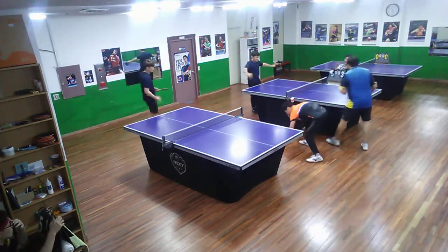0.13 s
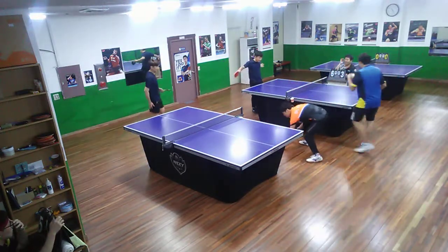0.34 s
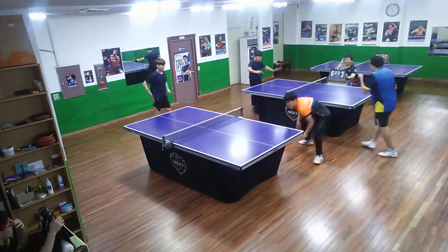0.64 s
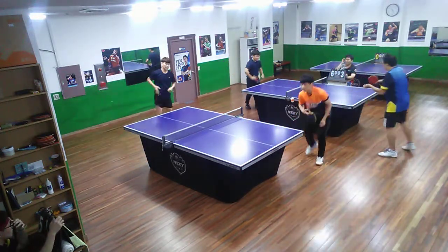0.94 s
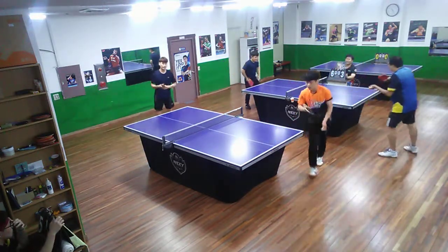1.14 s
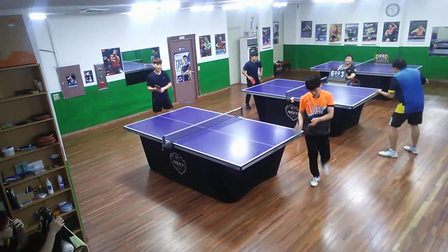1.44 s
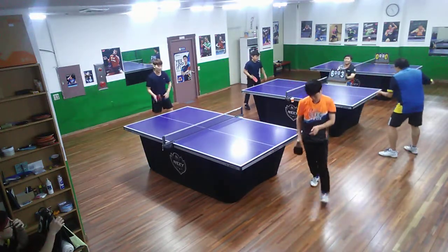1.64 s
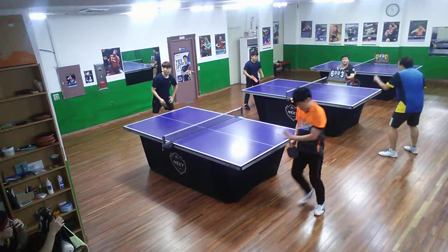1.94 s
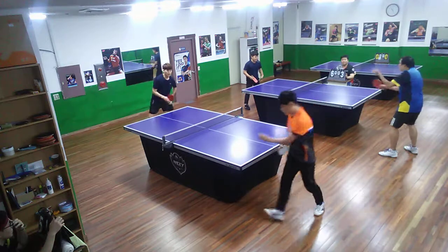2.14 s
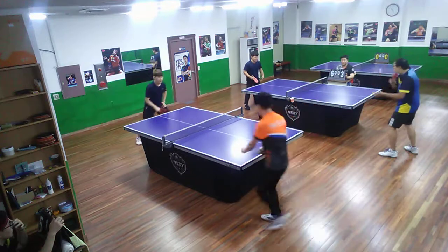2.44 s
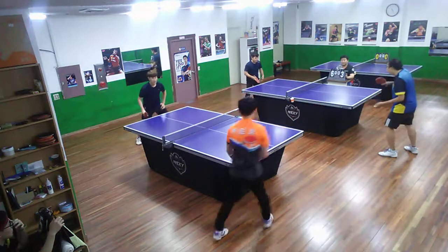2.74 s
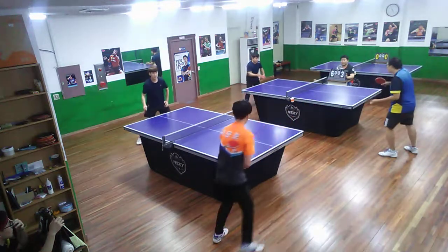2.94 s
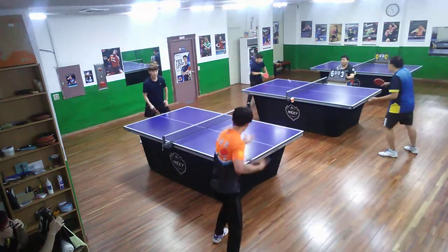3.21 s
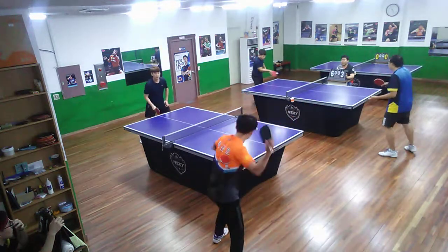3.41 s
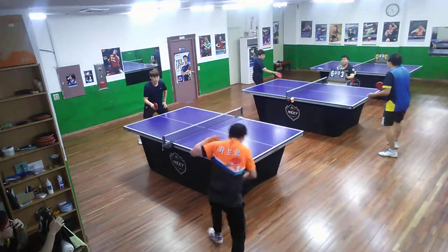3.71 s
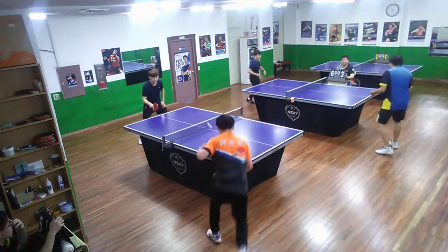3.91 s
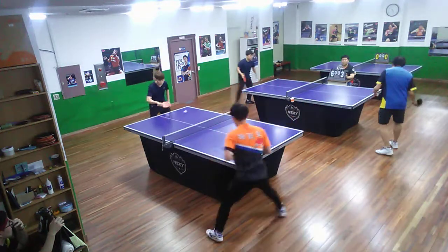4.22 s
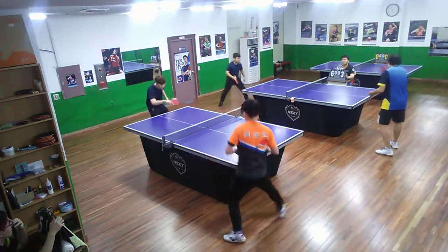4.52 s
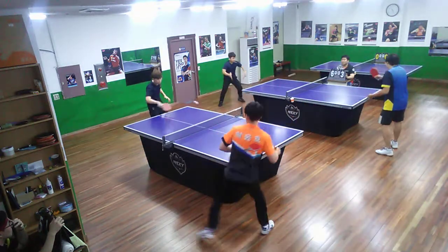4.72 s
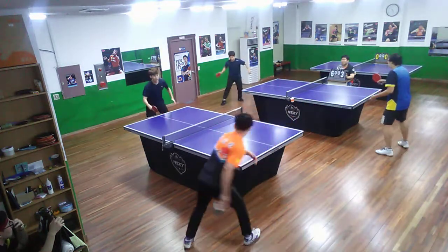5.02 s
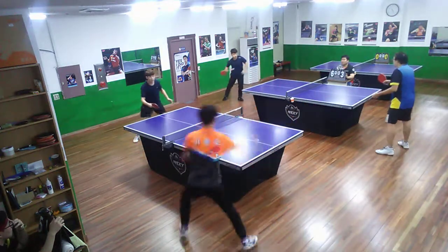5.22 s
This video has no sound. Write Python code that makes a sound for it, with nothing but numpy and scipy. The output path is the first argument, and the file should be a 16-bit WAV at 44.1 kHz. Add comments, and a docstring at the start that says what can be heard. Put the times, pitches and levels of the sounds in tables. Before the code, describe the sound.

Table tennis is heard in a bare, echoing club room through a fixed microphone, over a soft, suppressed ventilation hush. A shoe slaps and thuds on the wooden floor at the very start, and two hollow ball bounces follow around 0.3 seconds. Faint shoe squeaks come between 1 and 1.3 seconds. A table bounce at 1.4 leads to a sharp bat crack and a light step at 1.7. After a short lull and another step, four quick pocks cluster between 2.6 and 2.9. A bounce at 3.3 and faint squeaks precede bat hits at 3.5 and 3.7. At 3.8 a sharp heel clack and a heavy, booming stamp land, followed at once by a hard bat crack. Bounces ring at 4.1 and 4.4, with another bat hit and a footfall by 4.6. Two more bounces at 4.9 and 5.1 lead to a firm stroke at 5.3.

```python
"""Hollow pocks of table tennis echo from several tables around a bare club room.
Plastic balls knock on bats and table tops: the wood sounds and the thin shells ring.
Shoes slap, stamp and faintly squeak on the sprung wooden floor. It is all heard through a fixed camera,
whose noise suppressor holds down the ventilation and shortens the faint ends of the echoes."""
import sys
import numpy as np
from scipy import signal
from scipy.fft import rfft, irfft, next_fast_len
from scipy.io import wavfile
from scipy.ndimage import uniform_filter1d, map_coordinates

SR = 44100
rng = np.random.default_rng(int(sys.argv[2]) if len(sys.argv) > 2 else 0)


def generate_wav(sig):
    """Save sig (samples, or channels by samples) to the path in sys.argv[1] as 16-bit PCM at SR."""
    pcm = np.round(np.clip(np.atleast_2d(sig).T, -1, 1) * 32767).astype(np.int16)
    wavfile.write(sys.argv[1], SR, pcm)


N = 236420
SIZE = 4096  # samples in one dry contact
TIME = np.arange(SR) / SR
FREQS = np.fft.rfftfreq(SIZE, 1 / SR)

# Tone colour of a sole slapping the floor. Each row: frequency in Hz, level in dB.
SOLE_SLAP = [(60, -50.5), (200, -18), (600, 2.5), (1400, 2.5), (2300, -2), (3600, -0.5), (4300, 1),
             (5300, 1), (6600, -10.5), (9000, -19.5), (15000, -32)]


def amp(db):
    """Decibels to gain."""
    return 10 ** (np.asarray(db) / 20)


def along(points, hz):
    """Read a curve of (Hz, value) points on a log frequency axis."""
    f, v = np.transpose(points)
    return np.interp(np.log(hz + 1), np.log(f + 1), v)


def resonances(modes):
    """Gain over FREQS of modes, each given as centre in Hz, width in Hz, level in dB."""
    return sum(amp(db) / (1 + (2 * (FREQS - hz) / width) ** 2) for hz, width, db in modes)


def causal(gain):
    """The shortest pulse that has this gain over FREQS."""
    cepstrum = irfft(np.log(np.maximum(gain, 1e-6)))
    cepstrum[1:SIZE // 2] *= 2
    cepstrum[SIZE // 2 + 1:] = 0
    return irfft(np.exp(rfft(cepstrum)))


def burst(t60):
    """A dying puff of noise with energy 1."""
    puff = rng.standard_normal(SIZE) * np.exp(-np.log(1000) * TIME[:SIZE] / t60)
    return puff / np.linalg.norm(puff)


def add(track, s, sound):
    """Mix a sound in at s seconds."""
    start = max(round(s * SR), 0)
    part = sound[:max(len(track) - start, 0)]
    track[start:start + len(part)] += part


def hall(direct_db, build_s=0.011, wall_hz=12000):
    """The path from one spot in the room: direct sound, then a duller tail that swells and dies by band."""
    # Reverb time. Each row: frequency in Hz, seconds to fall 60 dB.
    reverb_times = [(100, 1.49), (300, 1.11), (700, 1.39), (1400, 1.15), (3000, 0.96), (5000, 0.9),
                    (8000, 0.72), (13000, 0.43)]
    hz, t, noise = signal.stft(rng.standard_normal(SR), SR, nperseg=256)
    fade = np.exp(-np.log(1000) * t / along(reverb_times, hz)[:, None])
    walls = 1 / np.sqrt(1 + (hz[:, None] / wall_hz) ** 16)  # the highest treble is soaked up
    tail = signal.istft(noise * fade * walls, SR, nperseg=256)[1][:SR]
    path = tail * (1 - np.exp(-TIME / build_s)) / np.sqrt(SR * .06)
    path[0] += amp(direct_db)
    return path


def ventilation(db=-54):
    """Moving air lays a soft, steady bed of noise."""
    # Colour of the air. Each row: frequency in Hz, relative level in dB.
    colour = [(18, -83), (30, -54.5), (328, -5), (355, -8.5), (460, -9.5), (567, -9.5), (774, -12),
              (1500, -16), (6200, -26), (7240, -27.5), (15000, -49)]
    gain = amp(along(colour, np.fft.rfftfreq(N, 1 / SR)))
    air = irfft(rfft(rng.standard_normal(N)) * gain, N)
    return amp(db) * air / air.std()


def squeaks(waver=0.086, drift_hz=1300):
    """Rubber sticks and slips on the varnish: a faint, unsteady, gliding whistle."""
    # Each row: start in seconds, relative level in dB, first and last pitch in Hz, length in seconds.
    slips = [(0.974, -61, 5050, 5026, 0.075), (1.075, -55, 5480, 5705, 0.06),
             (1.086, -58.5, 2300, 2270, 0.031), (1.138, -53, 1005, 577, 0.069),
             (1.311, -56.5, 2320, 2266, 0.015), (3.185, -60, 5225, 5480, .03),
             (3.444, -54.5, 2655, 2774, 0.072)]
    track = np.zeros(N)
    for s, db, start_hz, end_hz, length_s in slips:
        progress = np.minimum(TIME[:SIZE] / length_s, 1)
        drift = map_coordinates(rng.standard_normal(SIZE), [TIME[:SIZE] * drift_hz])
        hz = start_hz * (end_hz / start_hz) ** progress * (1 + waver * drift)
        whistle = amp(db) * np.sin(np.pi * progress) * np.sin(2 * np.pi * np.cumsum(hz) / SR)
        add(track, s, 2 * signal.fftconvolve(whistle, hall(direct_db=-1.3)))
    return track


def tread(gain, direct_db, decay_s):
    """A shoe's contact with this spectrum, heard through the room."""
    path = hall(direct_db - 18)
    add(path, 0, amp(direct_db) * burst(decay_s))  # the tread lands piece by piece
    return signal.fftconvolve(causal(gain), path)


def shoes(ring_width_hz=130):
    """The sole slaps, the boards thud, sole or board rings briefly, and the sprung floor booms."""
    # Each row: start in seconds, slap and thud in dB, ring pitch in Hz, ring and direct sound in dB,
    # contact decay in seconds.
    footfalls = [(0, 8, 10.5, 697, 26, -17, 0.011), (0.004, 6.5, -7.5, 421, 22, -6, 0.03),
                 (0.008, 2, -9, 1260, 23, -17, 0.024), (0.58, -10, -16, 774, -1, -6.5, 0.0087),
                 (1.657, -12, -12.5, 359, 13, -6, 0.046), (2.378, -5.5, -19, 1490, 2.5, -8.5, 0.006),
                 (3.8343, 9.5, 29, 350, 26, -3, 0.041), (4.549, 12, 11, 780, -27, -13, 0.014),
                 (4.563, 4, 10, 366, 19, -5.5, 0.0057)]
    # Thud of the floorboards. Each row: frequency in Hz, level in dB.
    thud_colour = [(50, -71), (145, -22), (190, -2), (300, 4), (480, -5.5), (800, -8.5), (1500, -19.5),
                   (3000, -13.5), (8000, -72)]
    # Low modes of the sprung floor. Each row: centre in Hz, width in Hz, level in dB.
    floor_modes = [(74.5, 4.8, -6), (104, 37, 5)]
    track = np.zeros(N)
    for s, slap_db, thud_db, ring_hz, ring_db, direct_db, decay_s in footfalls:
        slap = amp(slap_db + along(SOLE_SLAP, FREQS))
        thud = amp(thud_db + along(thud_colour, FREQS))
        ring = resonances([(ring_hz, ring_width_hz, ring_db)]) * np.minimum(FREQS / ring_hz, 1) ** 2
        boom = amp(-4.5 + 0.56 * thud_db) * resonances(floor_modes)  # heavier steps boom more
        add(track, s, tread(np.hypot(slap, thud + ring + boom), direct_db, decay_s))
    return track


def heel(slap_db=-7, direct_db=5.5):
    """A hard heel clacks twice, close and sharp, just ahead of the big stamp."""
    # Each row: start in seconds, level in dB, contact decay in seconds.
    clacks = [(3.8263, 3.5, 0.0056), (3.8321, 1, 0.014)]
    # The heel's two ringing modes. Each row: centre in Hz, width in Hz, level in dB.
    heel_modes = [(3496, 450, 11), (5270, 390, 10.5)]
    colour = np.hypot(amp(slap_db + along(SOLE_SLAP, FREQS)), resonances(heel_modes))
    track = np.zeros(N)
    for s, db, decay_s in clacks:
        add(track, s, tread(amp(db) * colour, direct_db, decay_s))
    return track


def pock(click_db, knock_db, crack_db, contact_hz, shell_hz, low_hz, tone_hz, tone_db, direct_db,
         tone_width_hz=260, shell_width_hz=900, bright_hz=2200, wall_delay_s=0.016):
    """The ball's half-sine push drives the wood and its own shell; its length notches the spectrum."""
    # How the struck wood radiates. Each row: frequency in Hz, level in dB.
    wood_colour = [(100, -10.5), (300, -4.5), (700, -8), (1500, 5.5), (3200, 7.5), (5000, 12.5), (7000, 5),
                   (11000, -31.5), (15000, -0.5)]
    # Modes of the ball's shell. Each row: multiple of the shell pitch, level in dB.
    shell_modes = [(0.998, 2.5), (1.214, -2.5), (1.35, -3.5), (1.509, -11), (1.72, -20.5)]
    # The crack of a hard hit. Each row: frequency in Hz, level in dB.
    crack_colour = [(300, -12.5), (1500, 5.5), (3000, -4), (5000, 0.4), (6800, -5), (9000, -13),
                    (12000, -26), (15000, -46.5)]
    cycles = FREQS / contact_hz  # contact_hz is 1 / contact time
    push = np.abs(np.sinc(cycles - .5) + np.sinc(cycles + .5)) * np.pi / 4
    push *= np.abs(np.cos(np.pi * np.maximum(cycles, 1))) ** 0.6  # wide notches make the pock hollow
    treble = 1 / (1 + (bright_hz / (FREQS + 1)) ** 4)
    level_db = knock_db * (1 - treble) + (18.5 + click_db) * treble  # knock below, click above
    wood = amp(level_db + along(wood_colour, FREQS)) + resonances([(tone_hz, tone_width_hz, tone_db)])
    shell = resonances([(shell_hz * ratio, shell_width_hz, 46 + click_db + db)
                        for ratio, db in shell_modes])
    crack = amp(crack_db + along(crack_colour, FREQS))  # fills the notches
    low_cut = 1 / np.sqrt(1 + (low_hz / (FREQS + 1)) ** 12)
    hit = causal(low_cut * np.hypot(push * (wood + shell), crack))
    path = hall(direct_db)
    add(path, .0004, amp(direct_db + 5.5) * burst(t60=0.031))  # scatter off table top and player
    echo_db = -10.5 + 0.27 * (knock_db - 14)  # the nearest wall answers harder knocks more strongly
    add(path, wall_delay_s, amp(echo_db) * burst(t60=0.032))
    return signal.fftconvolve(hit, path)


def bounces(edge_hz=802, db_per_octave=19):
    """The hard table tops all answer alike: a clean, hollow pock with a ringing shell."""
    # Each row: start in seconds, click, knock and crack in dB, contact rate and shell pitch in Hz.
    table_hits = [(0.306, 0.5, 4, -24, 1727, 7950), (0.356, 0, 1.5, -1, 1890, 8040),
                  (1.432, 2, 8, 1, 1564, 8540), (2.612, -0.5, 11, -15, 1452, 8400),
                  (2.712, -0.5, 6, -11.5, 1665, 7780), (2.8698, 0.5, 17.5, -8, 1562, 8110),
                  (3.282, 0.5, 16, -24.5, 1668, 8110), (4.099, 2.5, 17.5, 2.5, 1508, 8400),
                  (4.397, 3.5, 17, -5, 1475, 8230), (4.91, 1.5, 22.5, 0, 1624, 8160),
                  (5.109, 2, 17.5, 0, 1585, 8490)]
    track = np.zeros(N)
    for s, click_db, knock_db, crack_db, contact_hz, shell_hz in table_hits:
        # The camera's noise suppressor cuts more bass from quieter knocks, so they sound thinner.
        low_hz = edge_hz * 2 ** (-knock_db / db_per_octave)
        add(track, s, pock(click_db, knock_db, crack_db, contact_hz, shell_hz, low_hz,
                           tone_hz=1645, tone_db=knock_db - 9.5, direct_db=-17.5))
    return track


def strokes():
    """Bats crack more than tables, and each blade has its own tone."""
    # Each row: start in seconds; click, knock and crack in dB; contact rate, shell pitch, low cut
    # and blade tone in Hz; blade tone and direct sound in dB.
    bat_hits = [(1.6514, 8.5, 10.5, 9, 1607, 8750, 523, 1336, 8, -9),
                (2.679, -14, 12.5, 0, 1500, 7900, 469, 770, 10.5, -15.5),
                (3.533, -12, 14, -2, 2020, 8180, 833, 607, 29, -9),
                (3.7278, -9, 6, -3.5, 1370, 8550, 690, 887, -1, -11),
                (3.875, 3, 8, 13, 1550, 7750, 360, 1390, 23, -16),
                (4.428, -4, 18, 2, 1415, 7900, 700, 840, 23.5, -7.5),
                (5.305, -27, 22.5, 10, 1580, 8300, 595, 1700, 23, -12)]
    track = np.zeros(N)
    for s, *stroke in bat_hits:
        add(track, s, pock(*stroke))
    return track


def scene():
    """Balls and feet over the air of the room, in mono."""
    return (bounces() + strokes() + shoes() + heel() + squeaks() + ventilation())[None]


def suppress(x, depth_db=-19, steepness=2.54, contrast=0.16):
    """The noise suppressor ducks a band that sinks towards its quietest level or under its neighbours."""
    # Where the gate opens. Each row: frequency in Hz, dB over the band's quietest level.
    thresholds = [(100, 9), (300, 10), (900, 9.5), (8000, 7.5)]
    hz, _, bands = signal.stft(x, SR, nperseg=512)
    power = uniform_filter1d(np.abs(bands) ** 2, size=3, axis=1)  # smooth over frequency
    power = np.abs(uniform_filter1d(power, size=4, axis=2)) + 1e-20  # and over time
    quiet = uniform_filter1d(np.percentile(power, 10, axis=2, keepdims=True), size=3, axis=1)
    threshold = quiet * amp(along(thresholds, hz))[:, None] ** 2
    opening = 1 / (1 + (threshold / power) ** steepness)
    gate = amp(depth_db) + (1 - amp(depth_db)) * opening
    neighbours = np.abs(uniform_filter1d(power, size=11, axis=1)) + 1e-20
    sharpen = np.minimum(power / neighbours, 2) ** (contrast * opening)
    return signal.istft(bands * gate * sharpen, nperseg=512)[1][:, :N]


def record(dry, top_hz=15800):
    """The camera suppresses steady noise and keeps nothing above its band limit."""
    size = next_fast_len(N + SIZE)
    passband = np.fft.rfftfreq(size, 1 / SR) < top_hz
    return irfft(rfft(suppress(dry), size) * passband, size)[:, :N]


dry = scene()
out = record(dry)
generate_wav(out)
```